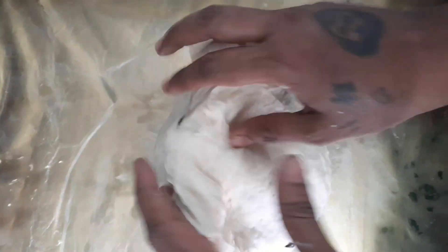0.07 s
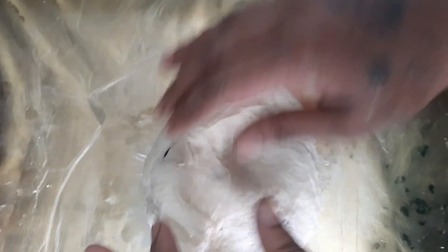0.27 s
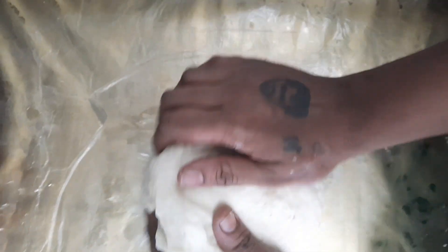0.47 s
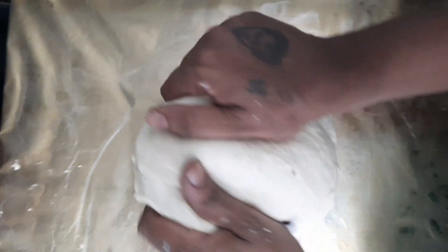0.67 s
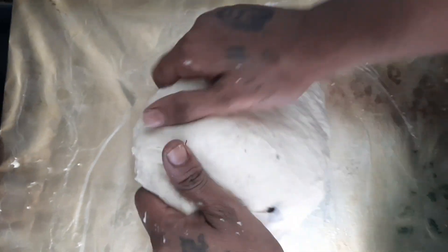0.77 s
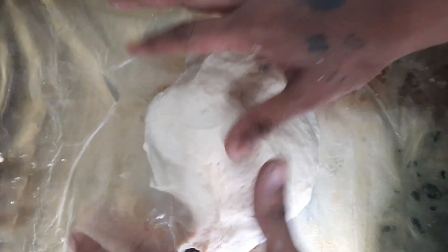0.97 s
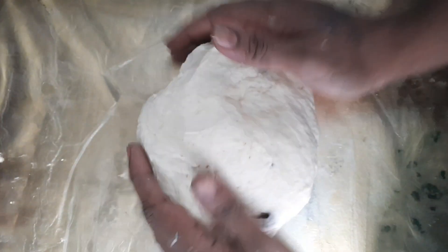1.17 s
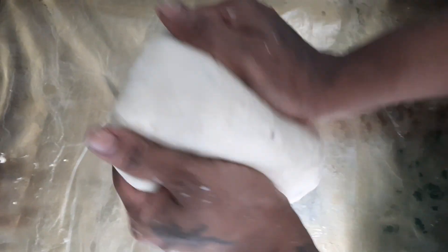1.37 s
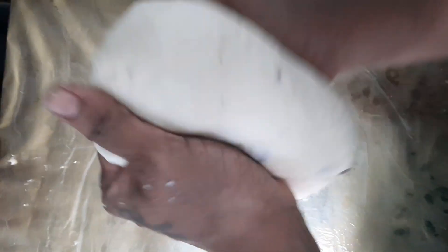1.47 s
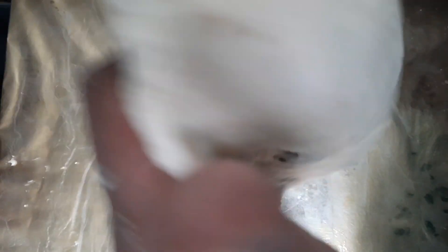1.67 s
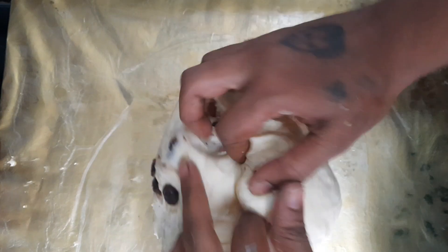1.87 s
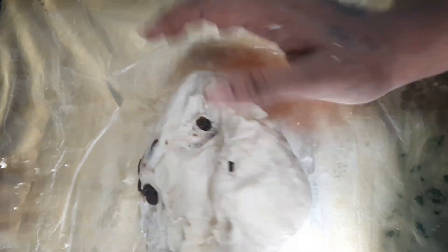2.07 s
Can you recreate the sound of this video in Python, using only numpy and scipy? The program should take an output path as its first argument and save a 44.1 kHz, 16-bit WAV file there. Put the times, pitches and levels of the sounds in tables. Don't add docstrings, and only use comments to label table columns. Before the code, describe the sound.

Dough is kneaded on a plastic sheet over a hollow counter: soft thumps, low scraping drags, crinkles and sticky pops, then a loud double-edged slap near the end, heard close in stereo in a quiet kitchen.

```python
import sys
import numpy as np
from scipy import signal
from scipy.io import wavfile

SR = 44100
rng = np.random.default_rng(int(sys.argv[2]) if len(sys.argv) > 2 else 0)


def output_pcm(signal):
    pcm = np.clip(np.atleast_2d(signal).T, -1, 1) * 32767
    wavfile.write(sys.argv[1], SR, np.round(pcm).astype(np.int16))


def elevation(decibels):
    levels = np.asarray(decibels, float)
    return 10 ** (levels / 20)


N = 92918
SLAP_S = 1.878


def rms_one(x):
    return x / np.sqrt(np.mean(x ** 2) + 1e-20)


def in_time(rows):
    s, db = np.transpose(rows)
    return elevation(np.interp(np.arange(N) / SR, s, db))


def at_hz(points, hz):
    point_hz, value = np.transpose(points)
    return np.interp(np.log(hz), np.log(point_hz), value)


def drift(rate):
    r = np.exp(-80 * np.pi * rate / SR)
    slow = signal.lfilter([1], [1, -2 * r, r * r], rng.standard_normal(N // 40 + 2002))
    slow = slow[2000:]
    return np.interp(np.arange(N) / 40, np.arange(len(slow)), rms_one(slow))


def half_sine(t, start, length):
    return np.sin(np.pi * np.clip((t - start) / length, 0, 1))


def highpass(x, order, hz):
    return signal.sosfilt(signal.butter(order, hz, "high", fs=SR, output="sos"), x)


def ring(clicks, hz, t60):
    r, w = elevation(-60 / (t60 * SR)), 2 * np.pi * hz / SR
    return signal.lfilter([0, np.sin(w)], [1, -2 * r * np.cos(w), r * r], clicks + 1e-18)


def swell_gain(hz, cycles):
    return 2 * np.log(1000) * hz / cycles / SR


def grains(rate, spread_db):
    size = elevation(spread_db * np.minimum(rng.exponential(1, N), 4)) * rng.choice([-1, 1], N)
    return size * (rng.random(N) < rate / SR)


# (frequency [Hz], left-right likeness [0-1])
LIKENESS = [(60, 0.9), (200, 0.97), (400, 0.77), (750, 0), (1400, 0.0), (15000, 0.016)]
# (frequency [Hz], level [dB])
LEAN = [(500, 0.0), (1300, 2.7), (4000, 0.36)]


def spread(mid, side, hz):
    alike = np.clip(at_hz(LIKENESS, hz), -1, 1)
    left_right = np.array([[1], [-1]])
    image = np.sqrt(1 + alike) * mid + np.sqrt(1 - alike) * side * left_right
    return image * elevation(at_hz(LEAN, hz) * left_right - 3)


def banded(source, spectrum, low_hz, top_hz, patchy_db):
    out, together = 0, drift(8.0)
    edges = 30 * 2 ** np.arange(0, 9.4, .5)
    for k, (low, high) in enumerate(zip(edges, edges[1:])):
        if low_hz <= high and low <= top_hz:
            band = signal.butter(2, [low, high], "band", fs=SR, output="sos")
            mid, side = signal.sosfilt(band, source[k % 2])
            hz = np.sqrt(low * high)
            level_db = at_hz(spectrum, hz) + patchy_db * (together + drift(9.2))
            out = out + elevation(level_db) * spread(mid, side, hz)
    return rms_one(out)


# (frequency [Hz], level [dB])
HUM = [(30, -10), (124, -2), (336, -5.5), (450, -22), (1400, -19), (4000, -26.5), (16000, -30)]


def kitchen():
    hum = banded(rng.standard_normal((2, 2, N)), HUM, low_hz=30, top_hz=17000, patchy_db=2.5)
    return elevation(-63.5) * hum + elevation(-90) * rng.standard_normal((2, N))


def room(x):
    room_t60_s, wall_cut_hz = 0.16, 9000
    out, dull = np.zeros((2, N)), np.exp(-2 * np.pi * wall_cut_hz / SR)
    lags = (rng.uniform(0.0069, 0.036, 12) * SR).astype(int)
    for k, lag in enumerate(lags):
        loop, gain, state = x.copy(), elevation(-60 * lag / SR / room_t60_s), [0.]
        for i in range(lag, N, lag):
            back, state = signal.lfilter([gain * (1 - dull)], [1, -dull], loop[i - lag:i], zi=state)
            loop[i:i + lag] += back[:N - i]
        out[k % 2] += (loop - x) * (-1) ** (k // 2)
    return out


# (time [s], level [dB])
SQUEAKS = [
    (0.052, -63),
    (0.158, -77),
]


def squeaks():
    t = np.arange(N) / SR
    swell = sum(elevation(db) * half_sine(t, s, 0.021) for s, db in SQUEAKS)
    return swell * np.sin(2 * np.pi * 14000 * t)


# (start [s], end [s], level [dB], fade [s])
RUSTLE = [(0, 0.124, -62, 0.15), (0.132, 0.288, -68, 0.029), (0.454, 0.466, -66, 0.07),
          (0.532, 0.62, -60.5, .02), (0.623, 0.74, -52, 0.013), (0.747, 0.814, -58.5, 0.01),
          (0.816, 0.94, -52, 0.013), (0.89, 0.994, -55.5, 0.025), (1.202, 1.246, -59, 0.024),
          (1.269, 1.306, -52, 0.045), (1.333, 1.437, -58.5, 0.022), (1.422, 1.486, -51.5, 0.026),
          (1.479, 1.524, -42, 0.019), (1.552, 1.643, -56, 0.043), (1.641, 1.685, -54.5, 0.025),
          (1.715, 1.835, -63.5, 0.027), (1.872, 1.934, -53.5, 0.12), (1.95, 1.982, -50, 0.039)]
# (frequency [Hz], level [dB per Hz])
SHEET = [(1000, -11), (2200, -3.5), (3500, 0.0), (8000, -1), (15000, -6)]


def sheet():
    attack_s, crinkles_per_s, crinkle_db = 0.0034, 1000, -11.5
    t, power = np.arange(N) / SR, 0
    for s, end, db, fade in RUSTLE:
        attack = np.clip((t - s) / attack_s + (s == 0), 0, 1)
        power = power + elevation(2 * db) * attack * np.exp(-2 * np.maximum(t - end, 0) / fade)
    smooth = rng.standard_normal((2, 2, N))
    crinkle = [rms_one(grains(crinkles_per_s * elevation(12.0 * drift(9.7)), 2.8)) for _ in range(4)]
    plastic = smooth + elevation(crinkle_db) * np.reshape(crinkle, (2, 2, N))
    return np.sqrt(power) * banded(plastic, SHEET, low_hz=1200, top_hz=17000, patchy_db=1.38)


# (time [s], peak level [dB], pitch [Hz], length [s], broad
# crack level [dB])
MORE_SNAPS = [(0.822, -64, 5000, 0.0024, 9), (0.957, -45, 3500, .012, -13), (1.004, -55, 6000, 0.0036, 11),
              (1.209, -58, 2500, .004, 16), (1.352, -58, 5340, .004, 3), (1.513, -33, 3500, .004, 0),
              (1.524, -38.5, 2960, 0.028, -8), (1.665, -52, 4500, .012, 17), (1.753, -47.5, 8200, 0.0044, -13),
              (1.962, -37.5, 1340, .025, -14), (1.975, -38, 3500, 0.013, -6), (1.983, -43, 1280, .02, -17)]
# (time [s], peak level [dB], pitch [Hz], length [s], broad crack level [dB])
SNAPS = [(0.1106, -40, 7900, 0.0046, -7), (0.45, -56, 5040, 0.001, -13), (0.4635, -44, 4050, 0.0026, 1.5),
         (0.6214, -33.5, 6860, 0.004, -10), (0.731, -46, 5500, 0.0071, -24), (0.8066, -43, 2000, 0.0034, 0),
         (0.947, -35.5, 1740, 0.028, -2.5), (1.197, -53, 7300, 0.0038, -4), (1.229, -45, 4200, 0.0061, -9),
         (1.265, -40, 7150, 0.0046, 5), (1.28, -47, 4520, 0.005, 8), (1.442, -37.5, 3420, 0.012, -9),
         (1.468, -42.5, 7450, 0.002, -13), (1.487, -28, 4100, .005, -2), (1.5008, -23, 2900, .003, -9),
         (1.5192, -27, 3600, .003, 3), (1.8287, -43, 8400, 0.0025, -23), (1.8748, -27.5, 8500, 0.0059, 5.5),
         (1.9522, -29, 1500, 0.0089, 0.5)]


def snaps(table):
    out, t = np.zeros((2, N + 4096)), np.arange(4096) / SR
    for s, db, hz, length, broad_db in table:
        noise = rng.standard_normal((2, 4096))
        noise = noise + 0.26 * noise[::-1]
        burst = noise * np.abs(noise) * np.sin(np.pi * np.minimum(t / length, 1) ** .5)
        broad = highpass(burst, 3, 0.74 * hz)
        snap = rms_one(ring(broad, hz, 3.5 / hz)) + elevation(broad_db) * rms_one(broad)
        peak = np.abs(snap.mean(axis=0)).max()
        i = int(s * SR)
        out[:, i:i + 4096] += elevation(db) * snap / peak * elevation([[.8], [-.8]])
    return out[:, :N]


# (start [s], end [s], frequency [Hz], rms level [dB])
JUDDERS = [
    (0.087, 0.34, 619, -54.5),
    (0.549, 0.604, 624, -38),
    (0.702, 0.876, 174.6, -41.5),
    (0.86, 1.013, 175.5, -38),
    (1.939, 2, 180.2, -33.5),
]


def judders():
    t, out = np.arange(N) / SR, 0
    for s, end, hz, db in JUDDERS:
        phase = 2 * np.pi * np.cumsum(hz + 5.99 * drift(26.9)) / SR
        level = elevation(db + 3.5 + 1.6 * drift(13.0)) * half_sine(t, s, end - s) ** .5
        hum = level * np.sin(phase)
        out = out + spread(hum, hum * 0, hz)
    return out


def pat(s, db, hz, t60, lean):
    cycles = 4.2
    click = np.zeros(N)
    click[int(s * SR)] = -elevation(db) * swell_gain(hz, cycles)
    x = ring(ring(click, hz, cycles / hz), hz, t60)
    return spread(x, lean * 0.32 * x, hz)


# (time [s], peak level [dB], frequency [Hz], t60 [s])
PATS = [(0.519, -37.5, 313, 0.064), (0.522, -43, 605, 0.06), (0.536, -37, 325, .06),
        (0.561, -29, 612, 0.074), (0.588, -28, 358, .06), (0.636, -38, 345, 0.052), (0.64, -40, 680, .06),
        (0.66, -41, 1160, .08), (0.675, -39, 907, 0.11), (0.7, -33, 1030, 0.056),
        (0.704, -24.5, 354, 0.028), (0.72, -33.5, 652, 0.043), (0.76, -47.5, 1022, 0.074),
        (0.89, -33.5, 580, 0.035), (1.2046, -30, 296, 0.069), (1.2235, -29.5, 644, 0.071),
        (1.2353, -24, 329, 0.04), (1.5185, -21.5, 724, 0.019), (1.55, -36.5, 290, 0.093),
        (1.586, -38.5, 293, 0.092), (1.621, -50, 1160, 0.033), (1.638, -40.5, 303, 0.068),
        (1.93, -21.5, 283, 0.051), (1.943, -23.5, 177, 0.079), (1.958, -28, 66, 0.11),
        (1.966, -21, 139, 0.059), (1.984, -24, 182.7, 0.12), (2.012, -25.5, 148.6, 0.11),
        (2.05, -33, 140, 0.18)]
# (time [s], level [dB], column of SLAP_MODES)
SLAP = [
    (1.873, -13, 1),
    (1.8808, -13.5, 2),
]
# (frequency [Hz], first landing [dB], second landing [dB], t60 [s])
SLAP_MODES = [(70, -22, -20, 0.086), (102, -18, -7, 0.064), (121.5, -5.5, -7, .09), (266, -6, -14, 0.12),
              (296.4, -0.5, -27, 0.12), (345, -6, -2.5, 0.093), (384, -13.5, 2.5, 0.07),
              (476, -6.5, -4, 0.12), (554, -10.5, -12.5, 0.087), (638, -13, -3.5, 0.085),
              (681, -10, -6.5, 0.078), (768, -30, -17, 0.092), (846, -14, -14, 0.077),
              (1095, -26, -20.5, 0.05)]


def pats():
    blows = list(PATS)
    for s, db, column in SLAP:
        for mode in SLAP_MODES:
            blows.append((s, db + mode[column], mode[0], mode[3]))
    return sum(pat(*blow, lean=(-1) ** k) for k, blow in enumerate(blows))


# (time [s], level [dB], hardness [Hz]: the push lasts one period)
THUMPS = [(0.011, -26, 118), (0.705, -31.5, 510), (0.738, -20.5, 107), (0.915, -24.5, 212),
          (1.2025, -35, 800), (1.224, -32.5, 800), (1.471, -29, 372), (1.4995, -22, 500),
          (1.5182, -28.5, 890), (1.623, -37.5, 472), (1.8731, -19, 800), (1.892, -29, 600),
          (1.971, -25, 154)]


def thumps():
    t, blows = np.arange(N) / SR, np.zeros((len(THUMPS), N))
    for row, (s, db, hz) in zip(blows, THUMPS):
        push = half_sine(t, s, 1 / hz) ** 2
        row -= elevation(db - 9) * push / push.sum()
    return blows


# (time [s], level [dB])
DRAG = [(0, -51.5), (.09, -61), (.15, -46), (.30, -49), (.42, -65), (.505, -57.5), (.54, -38.5),
        (.72, -35.5), (.79, -50.5), (.90, -38), (.98, -46.5), (1.05, -59.5), (1.196, -66), (1.204, -37.5),
        (1.38, -60), (1.50, -34), (1.58, -53.5), (1.86, -70.5)]
# (time [s], level [dB])
PRESS = [(0, -45), (.16, -50), (.40, -56), (.70, -45.5), (.74, -34.5), (.79, -42), (.86, -42), (.95, -34.5),
         (1.02, -44), (1.18, -56), (1.22, -38), (1.32, -42), (1.40, -51), (1.51, -45.5), (1.60, -52.5),
         (1.86, -57)]


def hands():
    t = np.arange(N) / SR
    before = t < SLAP_S
    settle_drag = elevation(-27.5 - 60 * (t - SLAP_S) / 0.61) * ~before
    settle_press = elevation(-25.5 - 60 * (t - SLAP_S) / 0.98) * ~before
    return in_time(DRAG) * before, in_time(PRESS) * before, settle_drag, settle_press


# (frequency [Hz], level [dB per Hz])
SKIN = [(700, 3.5), (1100, -8), (3000, -28.5)]


def scrape(slips, drag, settle_drag):
    skin = banded(slips.reshape(2, 2, N), SKIN, low_hz=800, top_hz=3000, patchy_db=1)
    return elevation(-10) * (drag + elevation(2.5) * settle_drag) * skin


# (frequency [Hz], struck [dB], dragged [dB], pressed [dB], t60 [s])
COUNTER = [(66, -24, -16, -12, 0.18), (91.5, -25, -27, -2, 0.12), (119.5, -5.5, -31, -2, 0.14),
           (142.1, -6, -35, -4.5, 0.63), (175.8, -21.5, -28, 0.5, 0.59), (283.2, -19, 0, -8, 0.13),
           (298.7, -0.5, -2.5, -19, 0.081), (341.4, 9.5, 1, -5.5, 0.092), (400, 1, -4.5, -44, 0.036),
           (458, 10.5, -4, -33, 0.072), (547.7, -14, -3, -61, 0.052), (629, -9, -2.5, -78, 0.095),
           (742, -37, -10.5, -57, 0.061), (880, -40, -36.5, -43, 0.13)]


def counter():
    slips_per_s, lurches_per_s, slip_spread_db = 2000, 250, 2.5
    swell_cycles, dough_damping = 2.96, 0.48
    drag, press, settle_drag, settle_press = hands()
    slips = np.array([grains(slips_per_s, slip_spread_db) for _ in range(4)])
    lurches = np.array([grains(lurches_per_s, slip_spread_db) for _ in range(4)])
    slips = highpass(slips, 2, 220)
    blows = thumps()
    luck = elevation(rng.normal(0, 2.96, (len(THUMPS), len(COUNTER))))
    out = np.zeros((2, N))
    for k, (hz, struck_db, dragged_db, pressed_db, t60) in enumerate(COUNTER):
        pair = slice(k % 2 * 2, k % 2 * 2 + 2)
        scale = np.sqrt(4 * np.log(1000) / t60 / SR) * elevation(-7.5)
        dragged = elevation(dragged_db) * (drag + settle_drag) * rms_one(slips[pair])
        pressed = elevation(pressed_db) * (press + settle_press) * rms_one(lurches[pair])
        murmur = ring(scale * (dragged + pressed), hz, t60)
        swell = ring(luck[:, k] @ blows, hz, swell_cycles / hz) * swell_gain(hz, swell_cycles)
        hit = ring(elevation(struck_db) * swell, hz, dough_damping * t60)
        mid, side = murmur + hit * [[1], [(-1) ** k]]
        out += spread(mid, side, hz)
    return out + scrape(slips, drag, settle_drag)


def scene():
    crack = snaps(SNAPS)
    background = kitchen() + elevation(-16) * room(crack[0])
    plastic = squeaks() + sheet() + snaps(MORE_SNAPS) + crack
    return background + plastic + judders() + pats() + counter()


def low_pass(x):
    return signal.sosfilt(signal.butter(12, 16410, fs=SR, output="sos"), x)


def record(dry):
    dip_hz, dip_width_hz, dip_share = 9830, 1540, 0.62
    x = highpass(dry, 3, 56)
    peak = signal.iirpeak(dip_hz, dip_hz / dip_width_hz, fs=SR)
    x = x - dip_share * signal.lfilter(*peak, x)
    x = signal.sosfilt(signal.cheby2(16, 60, 16000, fs=SR, output="sos"), x)
    return low_pass(x)


dry = scene()
out = record(dry)
output_pcm(out)
```